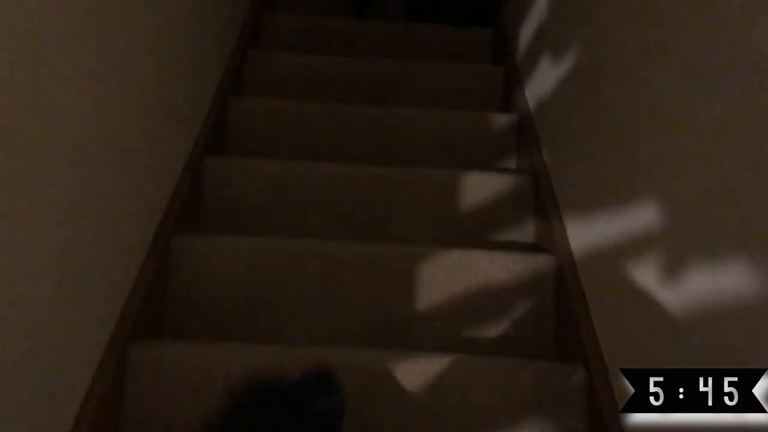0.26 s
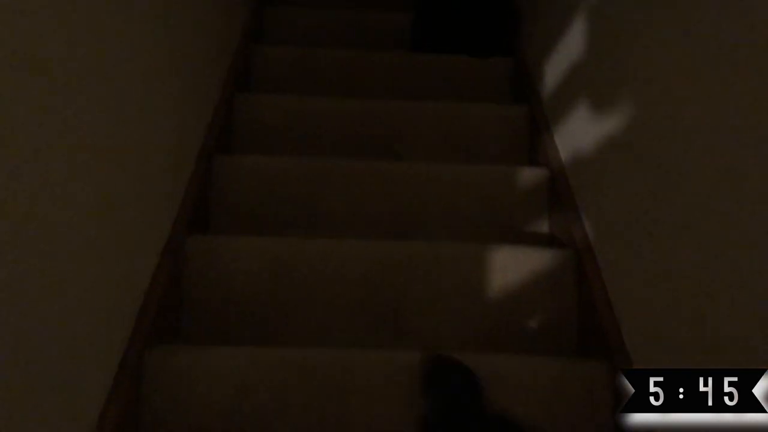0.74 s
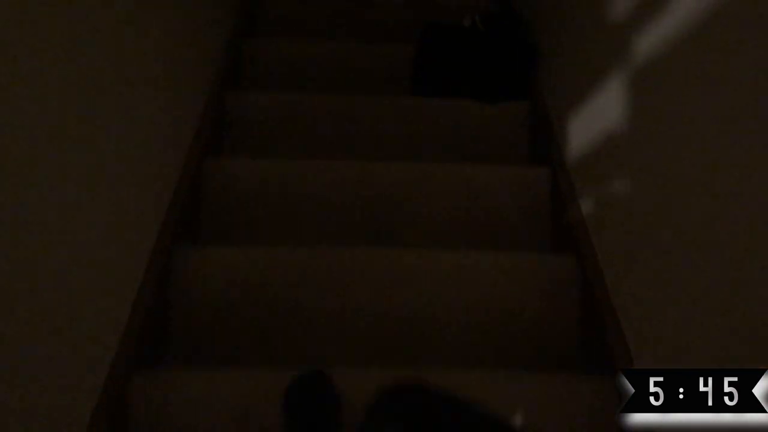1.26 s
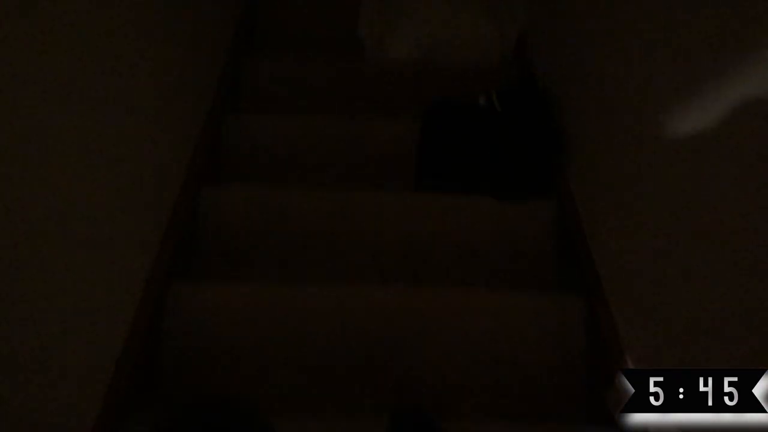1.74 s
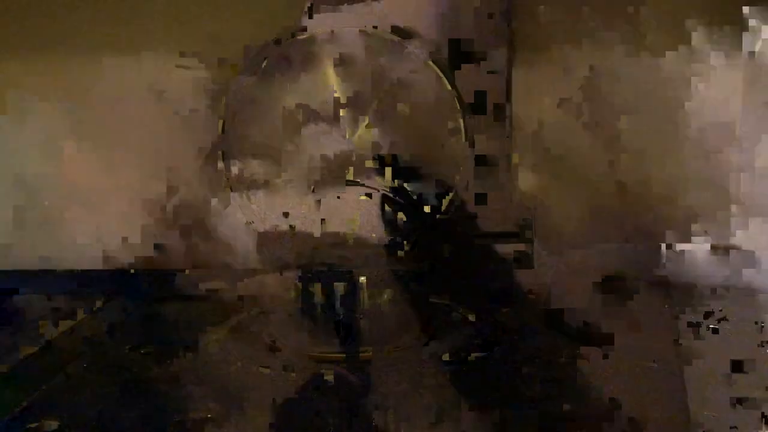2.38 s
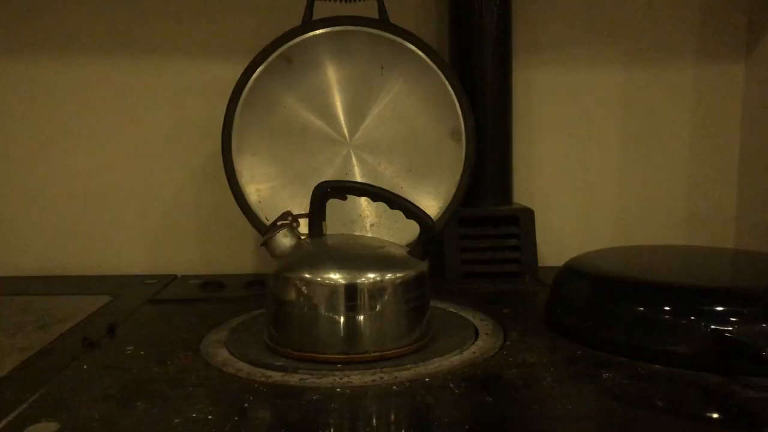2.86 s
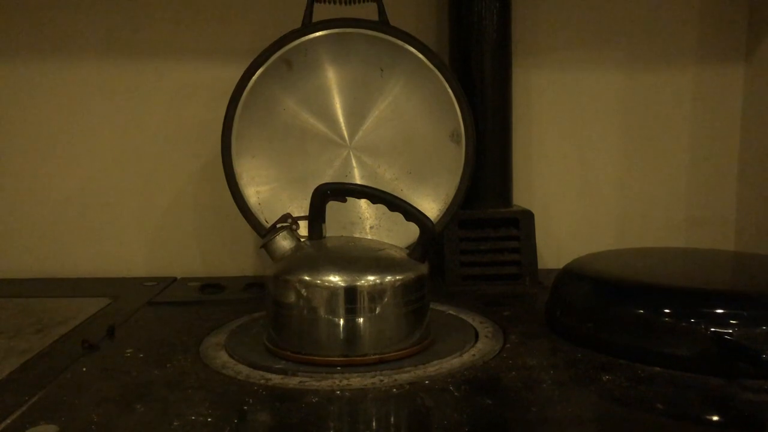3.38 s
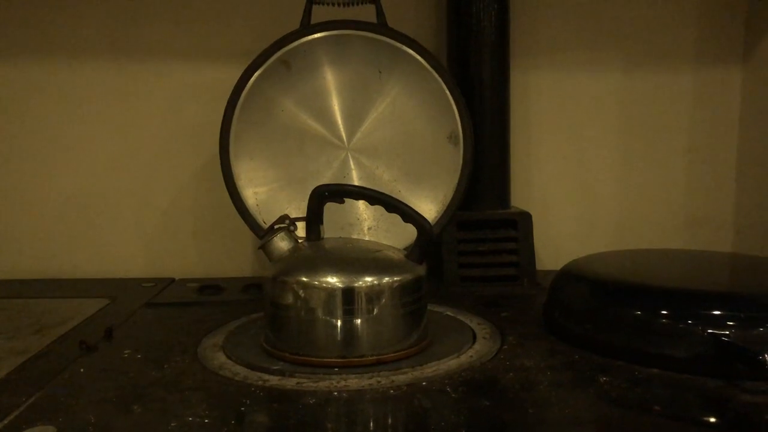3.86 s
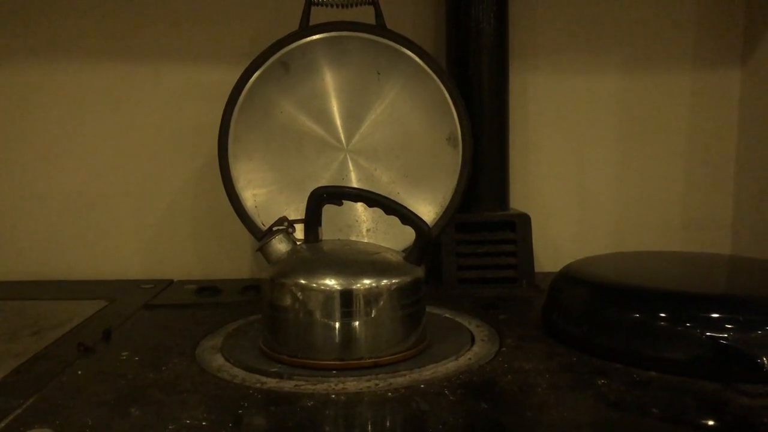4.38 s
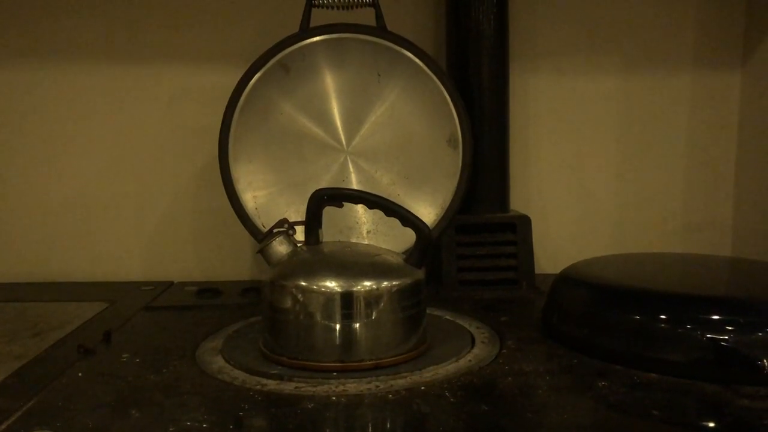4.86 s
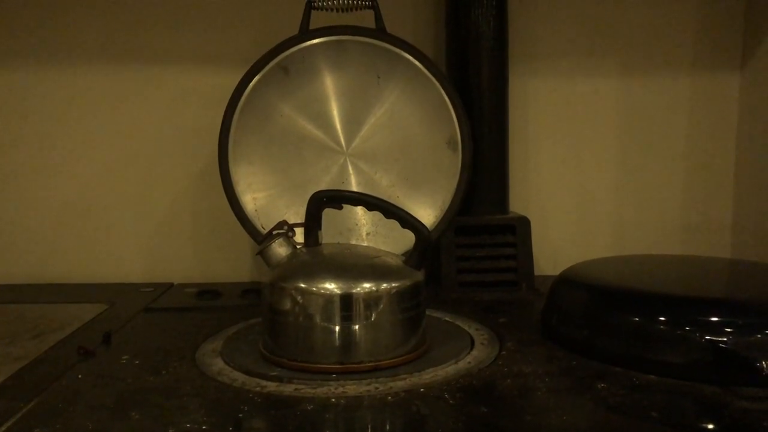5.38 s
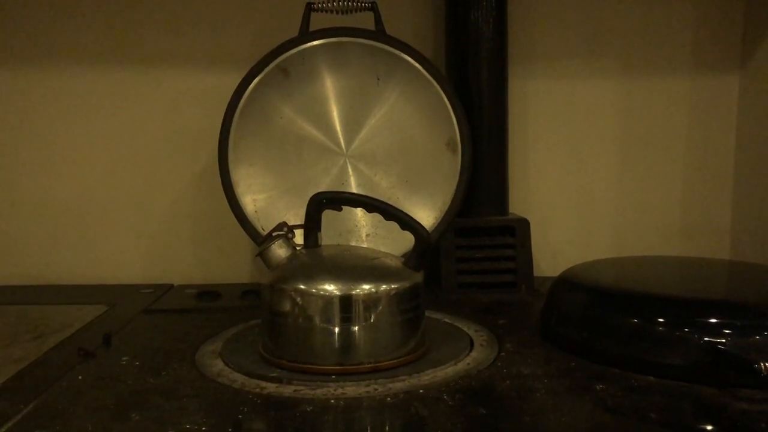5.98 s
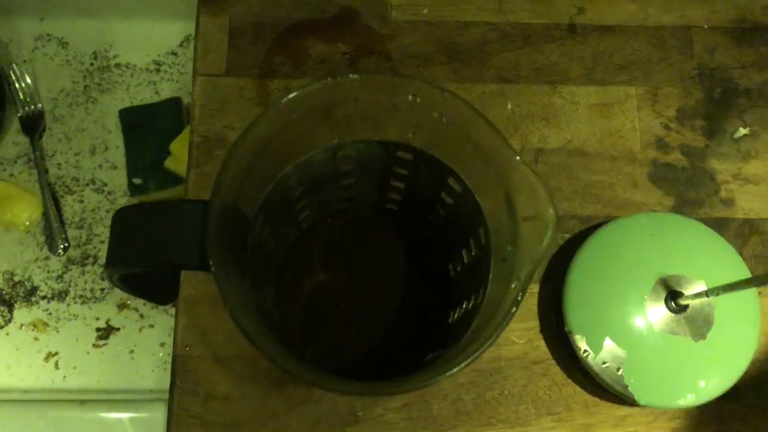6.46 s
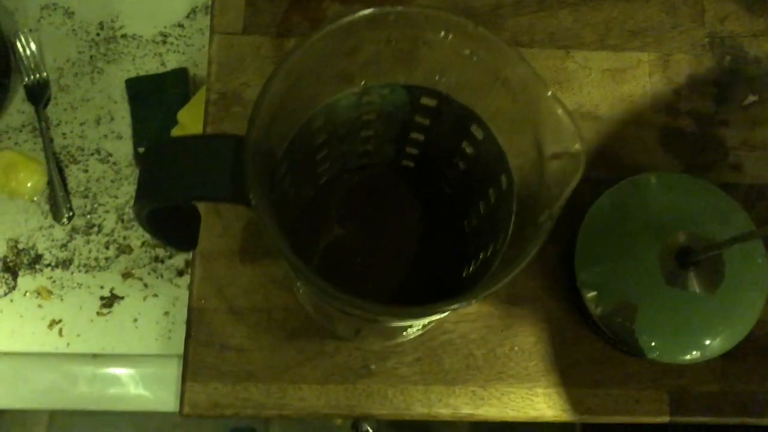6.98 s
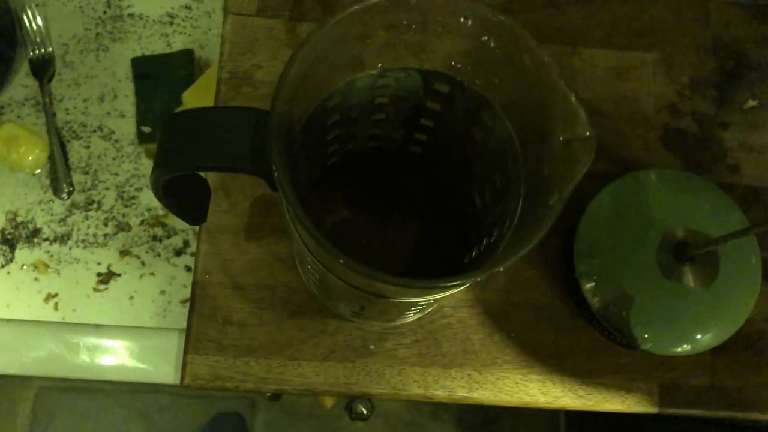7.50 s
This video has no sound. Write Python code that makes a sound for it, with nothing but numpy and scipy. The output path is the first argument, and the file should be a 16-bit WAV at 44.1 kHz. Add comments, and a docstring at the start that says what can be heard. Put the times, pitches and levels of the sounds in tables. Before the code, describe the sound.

From 0 to 2.25 seconds, feet move quickly on a carpeted wooden staircase, heard close in a small dull hall. Soft thumps and drier knocks come in irregular clusters, treads boom low and rumble under the weight, and trouser cloth swishes between steps. The heaviest landings come around 1.8 and 2.15 seconds. An abrupt cut at 2.25 starts a kettle whistle already sounding, high and thin, around 2.1 to 2.2 kilohertz, wavering with airy steam and tiny dropouts. A drop sizzles at 3.8; the tone strengthens from about 4.7, with a sharp spit near 4.9, and stays strong and piercing. At 6.35 it cuts off into a quiet kitchen. Between 6.5 and 6.75 a short rough slide, glassy clinks and a woody knock are heard with a faint ring. A dry double tick follows at 7.2 and a faint one at 7.4, over low room tone.

```python
"""House sounds in three places

Three places follow with abrupt changes, each over a room tone of coloured noise. On a carpeted wooden
stair, feet strike ringing wood modes, loaded treads boom and trousers rustle as noise swells. A kettle
whistles on a hot plate: a wavering sine with partials, steam noise and drops that spit. On a kitchen
counter small things knock and clink as struck modes, with noise ticks and a short noisy slide."""
import sys
import numpy as np
from scipy import signal
from scipy.fft import rfft, irfft, next_fast_len
from scipy.io import wavfile
from scipy.ndimage import uniform_filter1d

SR = 44100
rng = np.random.default_rng(int(sys.argv[2]) if len(sys.argv) > 2 else 0)


def digitize_waveform(pressure):
    """Quantize a signal to 16-bit integers and store it at the path in sys.argv[1].

    Rows of a 2-D input are taken as channels; values are limited to [-1, 1].
    """
    field = np.atleast_2d(pressure).T
    bounded = np.clip(field, -1, 1)
    quanta = np.round(bounded * 32767).astype(np.int16)
    wavfile.write(sys.argv[1], SR, quanta)


N = 340893
TIME = np.arange(N) / SR

STOVE_START_S, COUNTER_START_S = 2.255, 6.35

# resonances of the wooden stair: pitch_hz, level_db, t60_s
STAIR_MODES = [(148, 0, 0.082), (180.3, -4, 0.095), (224.3, -5.5, 0.11), (301.3, -5, 0.058)]


def from_db(db):
    """Decibels to gain."""
    return 10 ** (np.asarray(db) / 20)


def rms_one(x):
    """Scaled to unit power."""
    return x / np.sqrt(np.mean(x ** 2) + 1e-20)


def in_time(rows):
    """Every column after the first (time in s) as a curve over all samples."""
    time_s, *columns = np.transpose(rows)
    return [np.interp(TIME, time_s, column) for column in columns]


def between(start_s, end_s, fade_s=0.006):
    """One inside the span, zero outside, with short fades."""
    fade_in = np.clip((TIME - start_s) / fade_s, 0, 1)
    fade_out = np.clip((end_s - TIME) / fade_s, 0, 1)
    return fade_in * fade_out


def coloured(spectrum):
    """Noise with the given spectrum (Hz, relative dB per Hz); rms 1."""
    hz, level_db = np.transpose(spectrum)
    size = next_fast_len(N, True)
    axis_hz = np.maximum(np.arange(size // 2 + 1) * SR / size, 1)
    gain = from_db(np.interp(np.log(axis_hz), np.log(hz), level_db, left=-70, right=-70))
    return rms_one(irfft(rfft(rng.standard_normal(size)) * gain, size)[:N])


def drift(rate_hz):
    """Slow chance: noise through a double one-pole low-pass; spread 1."""
    pole = np.exp(-2 * np.pi * rate_hz / SR)
    noise = rng.standard_normal(N + SR)
    settled = signal.lfilter([1], [1, -2 * pole, pole * pole], noise)[SR:]
    return rms_one(settled)


def swells(starts_s, holds_s, peaks_db, rise_db_per_s, fall_db_per_s):
    """Gain that climbs to each peak, holds and falls away; overlapping swells add in power."""
    power = 0
    for start_s, hold_s, peak_db, rise in np.broadcast(starts_s, holds_s, peaks_db, rise_db_per_s):
        before_s = np.maximum(start_s - TIME, 0)
        after_s = np.maximum(TIME - start_s - hold_s, 0)
        power = power + from_db(2 * (peak_db - rise * before_s - fall_db_per_s * after_s))
    return np.sqrt(power)


def strike(times_s, levels_db, modes, soft_s, spread_db=7.5):
    """Blows of a given softness ring every mode, each blow with a balance of its own."""
    at = np.round(np.array(times_s) * SR).astype(int)
    ringing = np.zeros(N)
    chance = rng.standard_normal((len(at), len(modes)))
    for k, (hz, level_db, t60) in enumerate(modes):
        clicks = np.full(N, 1e-18)
        clicks[at] = from_db(levels_db + level_db + spread_db * chance[:, k])
        radius = from_db(-60 / (t60 * SR))
        angle = 2 * np.pi * hz / SR
        resonator = [1, -2 * radius * np.cos(angle), radius * radius]
        # neighbouring modes have opposite polarity
        ringing += signal.lfilter([0, np.sin(angle)], resonator, clicks) * (-1) ** k
    pole = np.exp(-1 / (soft_s * SR))   # a softer contact dulls the blow
    return signal.lfilter([1 - pole], [1, -pole], ringing)


def tick(start_s, level_db, centre_hz, width_hz, t60):
    """A burst of noise that dies at once, passed twice through one broad resonance."""
    t = np.arange(SR // 5) / SR
    out, at = np.zeros(N + SR), round(start_s * SR)
    b, a = signal.iirpeak(centre_hz, centre_hz / width_hz, fs=SR)
    burst = rng.standard_normal(len(t)) * from_db(-60 * t / t60)
    burst = signal.lfilter(b, a, signal.lfilter(b, a, burst))
    out[at:at + len(t)] = from_db(level_db) * burst / np.abs(burst).max()
    return out[:N]


def room(x, t60):
    """Diffuse reflections: an answer of decaying noise, unit power."""
    t = np.arange(int(.7 * SR)) / SR
    answer = rng.standard_normal(len(t)) * from_db(-60 * t / t60) * (t > .004)
    return signal.fftconvolve(x, answer / np.sqrt(np.sum(answer ** 2)))[:N]


def hall_tone():
    """Steady room tone of the stair: noise weighted to the bass."""
    # pitch_hz, level_db (per Hz)
    hall_spectrum = [(15, -41), (25, 7), (75, 3), (156, -6), (368, -7), (433, -3), (666, -14.5),
                     (5010, -21), (15500, -29)]
    return from_db(-67) * coloured(hall_spectrum)


def kitchen_tone():
    """Room tone at the counter: coloured noise whose level drifts slightly."""
    # pitch_hz, level_db (per Hz)
    kitchen_spectrum = [(15, -45), (25, -9), (221, -5.5), (340, -12), (445, -7.5), (648, -18), (1170, -18),
                        (1270, -19.5), (1620, -19), (2120, -25), (2300, -22.5), (15500, -36)]
    return from_db(-68.5 + 0.22 * drift(10.0)) * coloured(kitchen_spectrum)


def stove_tone():
    """Room tone at the stove: low noise whose level wavers."""
    # pitch_hz, level_db (per Hz)
    stove_spectrum = [(15, -62), (25, -25.5), (81, 1.5), (210, -3), (270, 2), (329, -5), (583, -10.5),
                      (661, -7), (1190, -15), (1800, -24), (2340, -32), (3960, -120)]
    return from_db(-67.5 + 2.4 * drift(12)) * coloured(stove_spectrum)


def trousers():
    """One trouser leg swings past the other: cloth noise swells, with a brighter swish on top."""
    # passing_s, swell_db_per_s, rustle_db, swish_db
    swings = [(0.04, 150, -65.5, -78), (0.148, 56, -61.5, -75), (0.33, 97, -71, -73), (0.48, 52, -60, -76),
              (0.591, 72.5, -59, -69), (0.84, 66, -67.5, -75), (1.019, 59, -61, -70),
              (1.165, 900, -66, -73), (1.272, 122, -60.5, -71), (1.40, 90, -67, -69.5),
              (1.461, 90, -59, -69), (1.74, 57, -65.5, -76), (1.83, 92, -62, -71), (2.021, 150, -67.5, -87),
              (2.21, 56, -60.5, -71)]
    # spectrum of the rustle: pitch_hz, level_db (per Hz)
    cloth = [(240, -22), (400, -8.5), (798, -7.5), (1040, -8), (1680, -10), (5070, -13.5), (9000, -27.5),
             (11700, -36), (19800, -120)]
    passing_s, swell_db_per_s, rustle_db, swish_db = np.transpose(swings)
    rustle = swells(passing_s, 0, rustle_db, swell_db_per_s, 300)
    rustle *= from_db(1.93 * drift(68)) * coloured(cloth)
    swish = swells(passing_s, 0, swish_db, 230, 340)
    swish *= coloured([(5000, -8.0), (8000, 4), (15500, -8)])
    return rustle + swish


def loaded_treads():
    """Body weight lands on a tread: the flight booms at a wavering pitch and the wood rumbles."""
    # full_load_s, hold_s, boom_db, boom_hz, rumble_db
    loads = [(0.049, 0.061, -45, 93.6, -51.5), (0.227, .05, -56.5, 66.6, -58.5),
             (0.354, 0.026, -48.5, 94.1, -53), (0.472, 0.016, -41.5, 83.4, -50.5),
             (0.599, 0.017, -48, 88, -49.5), (0.899, 0.038, -46, 90.5, -51.5),
             (1.018, 0.016, -53.5, 85, -64), (1.22, .02, -67, 77.8, -65.5),
             (1.32, 0.061, -53.5, 74.7, -50.5), (1.456, .02, -49.5, 71.5, -55),
             (1.756, 0.047, -41.5, 66.9, -44.5), (1.855, 0.026, -48.5, 69.2, -57.5),
             (2.147, 0.033, -35.5, 66, -40.5)]
    load_db_per_s, unload_db_per_s = 700, 178   # how fast a load comes and goes
    load_s, hold_s, boom_db, boom_hz, rumble_db = np.transpose(loads)

    # the pitch depends on the tread that carries the weight
    pitch_hz = np.interp(TIME, load_s, boom_hz) + 5 * drift(10)
    boom = from_db(1.2 * drift(12)) * np.sin(2 * np.pi * np.cumsum(pitch_hz) / SR)
    boom *= swells(load_s, hold_s, boom_db, load_db_per_s, unload_db_per_s)

    # the rolling foot keeps shaking the tread
    shaken_s = rng.uniform(0, N / SR - .01, size=900)
    rumble = strike(shaken_s, 0, STAIR_MODES, 0.00083, spread_db=6.0)
    rumble /= np.sqrt(uniform_filter1d(rumble ** 2, size=2600) + 1e-12)   # level evened over 60 ms
    rumble *= swells(load_s, hold_s, rumble_db, load_db_per_s, unload_db_per_s)
    return boom + rumble


def footfalls():
    """Heel and toe blows: soft thumps ring the stair, harder knocks the board, with noise ticks."""
    # start_s, knock_db, thump_db, tick_db, tick_hz
    steps = [(0.016, -60, -47, -65, 1670), (0.046, -56.5, -55, -51.5, 6500), (0.301, -64, -70, -47, 1440),
             (0.347, -57.5, -60, -62, 1280), (0.383, -59.5, -45.5, -49.5, 2260),
             (0.481, -50.5, -63, -44, 1210), (0.58, -52.5, -51, -47, 1230), (0.88, -62.5, -42.5, -54, 1750),
             (0.927, -57, -52, -52.5, 1210), (1.153, -69, -72, -47, 1183), (1.199, -50, -67, -44.5, 1260),
             (1.312, -77, -40, -52, 2190), (1.346, -57, -68, -52, 1260), (1.395, -57.5, -52, -42.5, 2270),
             (1.723, -52.5, -43, -60, 1640), (1.754, -53.5, -52, -63, 1342),
             (1.781, -50.5, -28.5, -50, 1221), (1.797, -47, -51, -51, 1237), (2.099, -63, -45.5, -54, 2210),
             (2.142, -41.5, -59, -40.5, 1300), (2.171, -43.5, -53, -47, 1300),
             (2.241, -50.5, -41, -46, 1510)]
    # resonances of the board: pitch_hz, level_db, t60_s
    board_modes = [(362, 4.5, 0.067), (459, 0, 0.08), (578, 5.5, 0.032), (782, -1.5, 0.042),
                   (970, -1.5, 0.026), (1256, -2, 0.027), (1820, -13, 0.012), (2740, -11, 0.015)]
    start_s, knock_db, thump_db, tick_db, tick_hz = np.transpose(steps)
    blows = strike(start_s, thump_db, STAIR_MODES, 0.0011, spread_db=3.5)
    blows += strike(start_s, knock_db, board_modes, .00008, spread_db=0.5)
    for at_s, level_db, hz in zip(start_s, tick_db, tick_hz):
        blows += tick(at_s, level_db, hz, hz, 0.032)
    return blows + from_db(-4.5) * room(blows, 0.24)


def stair():
    """Trousers rustle, feet load the treads and heels knock, over the hall's room tone."""
    return hall_tone() + trousers() + loaded_treads() + footfalls()


def counter_slide():
    """Something dragged along the counter: friction noise of unsteady level."""
    # time_s, level_db
    slide_course = [(6.485, -100), (6.495, -66.5), (6.53, -65.5), (6.56, -71), (6.6, -64), (6.66, -65.5),
                    (6.7, -70), (6.74, -77), (6.8, -105)]
    # pitch_hz, level_db (per Hz)
    slide_spectrum = [(800, -3), (1500, -5), (2500, -6), (5000, -3.5), (8000, -12), (15500, -26)]
    level_db = in_time(slide_course)[0] + 3.8 * drift(60)
    return from_db(level_db) * coloured(slide_spectrum)


def counter_taps():
    """Knocks ring wood, clinks ring glass, some blows a longer low ring; dry ticks are noise bursts."""
    # a weight set down on the counter: start_s, level_db
    knocks = [(6.601, -45), (6.698, -63)]
    # small glassy blows: start_s, level_db
    clinks = [(6.5145, -49.5), (6.536, -53.5), (6.5745, -55), (6.634, -62), (6.6867, -52)]
    # blows that set the low ring off: start_s, level_db
    ring_blows = [(6.513, -69), (6.635, -61)]
    # dry ticks: start_s, level_db, centre_hz, width_hz, t60_s
    dry_ticks = [(4.6, -47.5, 8000, 8200, 0.093), (6.60, -41, 7700, 4000, 0.087),
                 (7.186, -43.5, 910, 460, 0.017), (7.185, -51.5, 7700, 2600, 0.019),
                 (7.186, -54.5, 3000, 3010, 0.016), (7.215, -54, 3050, 630, 0.059),
                 (7.217, -60, 2000, 360, 0.04), (6.3, -57, 5900, 9000, .06),
                 (7.404, -58.5, 4000, 8000, 0.058)]
    # resonances of the counter, the glass and the low ring: pitch_hz, level_db, t60_s
    counter_modes = [(137.6, -15.5, 0.94), (207.5, 6.5, 0.17), (223, 2.5, 0.081), (387, -13, 0.06),
                     (532, -10, 0.19)]
    glass_modes = [(2305, 4, 0.031), (2620, -8, 0.043), (3250, -9.5, 0.048), (4100, -12, 0.078),
                   (5000, -20, .06)]
    ring_modes = [(1357, 1, 0.46)]
    taps = strike(*np.transpose(knocks), counter_modes, 0.00019, spread_db=1.0)
    taps += strike(*np.transpose(clinks), glass_modes, .00003, spread_db=3.5)
    taps += strike(*np.transpose(ring_blows), ring_modes, .00003, spread_db=0.0)
    taps += sum(tick(*row) for row in dry_ticks)
    return taps + from_db(-7.5) * room(taps, 0.31)


def counter():
    """Small things handled on the counter, over the kitchen's room tone."""
    return kitchen_tone() + counter_slide() + counter_taps()


def spits():
    """A drop flashes to steam on the hot plate: a fast hiss that dies away."""
    # start_s, level_db, rise_s, t60_s
    drops = [(3.81, -48, 0.015, 0.99), (4.862, -44.5, 0.0078, 0.074)]
    # pitch_hz, level_db (per Hz)
    spit_spectrum = [(700, -17.5), (1100, -5.5), (1800, -2.5), (3000, -5.5), (4500, -3), (7500, -7.5),
                     (11000, -11), (15500, -24)]
    shape = np.zeros(N)
    for start_s, level_db, rise_s, t60 in drops:
        rise = np.clip((TIME - start_s) / rise_s, 0, 1)
        fading_s = np.maximum(TIME - start_s - rise_s, 0)
        shape += rise * from_db(level_db - 60 * fading_s / t60)
    return shape * coloured(spit_spectrum)


def follow_whistle(base_db, db_per_hz, db_per_db, pitch_hz, tone_db):
    """A level that follows the whistle's pitch and strength, base_db at 2170 Hz and -37 dB."""
    return base_db + db_per_hz * (pitch_hz - 2170) + db_per_db * (tone_db + 37)


def steam(pitch_hz, tone_db, flutter):
    """Escaping steam: broad hiss plus a top sizzle that flutters more, both following the whistle."""
    # broad hiss: pitch_hz, level_db (per Hz)
    steam_spectrum = [(900, -6.5), (1500, -5), (2000, -1), (3000, 1.5), (5000, -2), (6200, 3), (7500, -3.5),
                      (10500, -2), (12500, -17.5), (15900, -21)]
    # top of the hiss: pitch_hz, level_db (per Hz)
    sizzle_spectrum = [(7000, -11), (10500, 0), (13500, -3), (15900, -6.5)]
    steam_db = follow_whistle(-60.5, 0.031, .2, pitch_hz, tone_db)
    sizzle_db = follow_whistle(-72, 0.095, 0.51, pitch_hz, tone_db)
    hiss = from_db(steam_db + flutter + 1.4 * drift(27)) * coloured(steam_spectrum)
    return hiss + from_db(sizzle_db + 5.2 * flutter) * coloured(sizzle_spectrum)


def upper_partials(phase, pitch_hz, tone_db, flutter):
    """Multiples of the whistle pitch, trembling more than the tone; the third follows its own law."""
    # multiple (of the pitch), level_db (relative to the tone)
    partials = [(2, -27.5), (4, -35.5), (5, -33.5), (6, -45.5), (7, -47.5)]
    rough = phase + 0.21 * drift(97)
    upper = np.zeros(N)
    for multiple, level_db in partials:
        upper += from_db(level_db + 2.0 * flutter + 2.2 * drift(52)) * np.sin(multiple * rough)
    upper *= from_db(tone_db)
    third_db = follow_whistle(-61.5, 0.067, .15, pitch_hz, tone_db)
    upper += from_db(third_db + 4.0 * flutter + 1.8 * drift(28)) * np.sin(3 * rough)
    return upper + from_db(-3.5) * room(upper, 0.39)


def whistle_tone(phase, tone_db):
    """The held tone beats with its own echoes and drops out for moments; the cap limits its band."""
    # brief dips of the tone: return_s, depth_db, length_s (nominal)
    dropouts = [(2.515, 2, 0.01), (2.59, 13, 0.022), (2.701, 13, 0.026), (2.942, 15, 0.0093),
                (3.775, 35.5, 0.027), (4.051, 29, 0.014), (4.14, 29, 0.025), (4.243, 15, 0.01),
                (4.405, 14, 0.013), (4.52, 13.5, 0.014), (4.698, 29, 0.027), (5.124, 5.5, 0.021),
                (5.241, 14.5, 0.008), (6.237, 7, 0.0099)]
    # turbulence in the cap, thin strands beside the tone: pitch_hz, level_db (per Hz)
    strands = [(1500, -38.5), (1650, -14.5), (1860, -26), (1925, -3), (1955, -15), (1985, -6),
               (2030, -18.5), (2080, 2.5), (2200, 11.5), (2290, -13.5), (2322, 3), (2400, -18), (2430, -7),
               (2550, -25)]
    drop_db = np.zeros(N)
    for return_s, depth_db, length_s in dropouts:
        from_middle = np.abs(2 * (TIME - return_s) / length_s + 1)
        drop_db += depth_db * np.clip(1 - from_middle / 0.91, 0, 1)
    tone = np.sin(phase) * from_db(2.47 * drift(55))
    tone = rms_one(tone + from_db(-8) * room(tone, .45))
    tone *= from_db(tone_db - drop_db)
    cap_band = signal.butter(2, (1960, 2470), "band", fs=SR, output="sos")
    tone = signal.sosfilt(cap_band, tone)
    return tone + from_db(tone_db - 17.5) * room(coloured(strands), 0.44)


def kettle():
    """A steam jet through the cap holds a wavering tone, steadier as it gets stronger."""
    # time_s, pitch_hz, tone_db
    whistle_course = [(2.27, 2185, -45), (2.33, 2176, -42.3), (2.55, 2148, -42.5), (2.97, 2130, -40.5),
                      (3.19, 2207, -37.5), (3.32, 2135, -39), (3.5, 2117, -39.5), (3.8, 2097, -41),
                      (3.97, 2156, -35.5), (4.08, 2116, -39), (4.35, 2118, -37), (4.55, 2179, -38),
                      (4.68, 2243, -35), (4.76, 2225, -31.5), (4.82, 2208, -32), (4.91, 2239, -30.5),
                      (5.1, 2185, -31), (5.25, 2189, -34.5), (5.42, 2131, -31.5), (5.53, 2204, -31),
                      (5.68, 2197, -32.5), (5.77, 2137, -30.5), (6.0, 2175, -32.5), (6.17, 2196, -29.5),
                      (6.33, 2209, -32)]
    pitch_hz, tone_db = in_time(whistle_course)
    unsteadiness = from_db(.4 * (-37 - tone_db))   # 1 at a tone level of -37 dB
    flutter = 1.4 * np.tanh(drift(12)) * unsteadiness   # a weak jet comes in bursts
    wobble_hz = 13 * unsteadiness * drift(20)
    quiver_hz = 11 * drift(60)
    phase = 2 * np.pi * np.cumsum(pitch_hz + wobble_hz + quiver_hz) / SR
    hiss = steam(pitch_hz, tone_db, flutter)
    upper = upper_partials(phase, pitch_hz, tone_db, flutter)
    return hiss + upper + whistle_tone(phase, tone_db)


def scene():
    """Stair, stove and counter, one after the other with very short crossfades."""
    stove = stove_tone() + spits() + kettle()
    mix = stair() * between(-1, STOVE_START_S + 0.0075)
    mix += stove * between(STOVE_START_S - .004, COUNTER_START_S)
    mix += counter() * between(COUNTER_START_S - .004, 9)
    return mix[None]


def record(dry):
    """The microphone drops the deepest bass; the top of the band is cut steeply."""
    bass_cut = signal.butter(2, 40, "high", fs=SR, output="sos")
    top_cut = signal.ellip(14, .5, 70, 15710, fs=SR, output="sos")   # 0.5 dB ripple, 70 dB stop band
    return signal.sosfilt(top_cut, signal.sosfilt(bass_cut, dry))


dry = scene()
out = record(dry)
digitize_waveform(out)
```